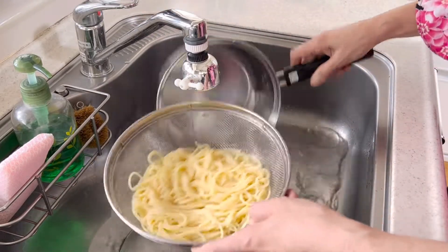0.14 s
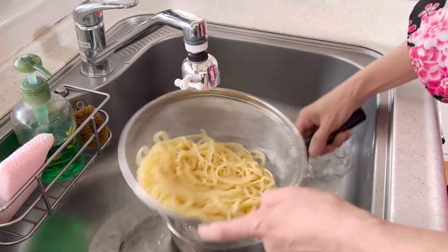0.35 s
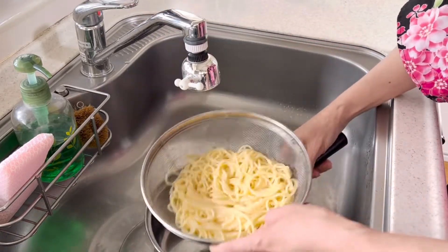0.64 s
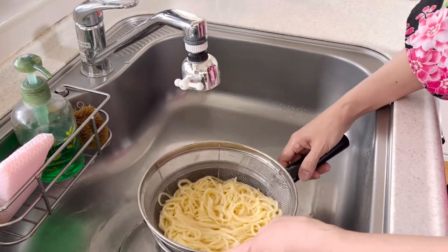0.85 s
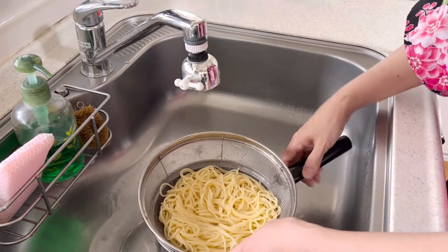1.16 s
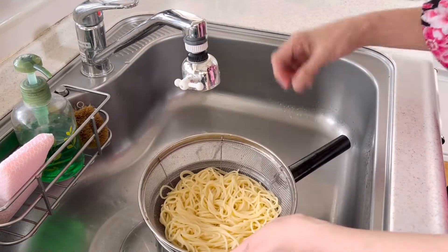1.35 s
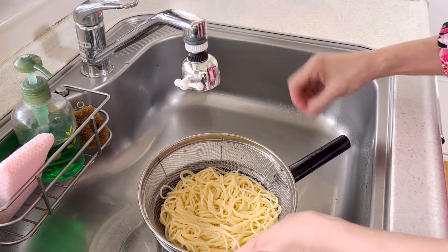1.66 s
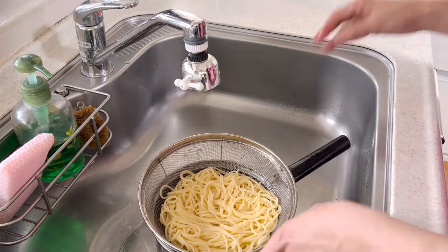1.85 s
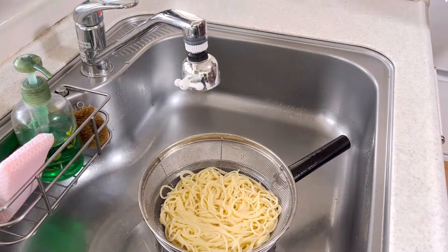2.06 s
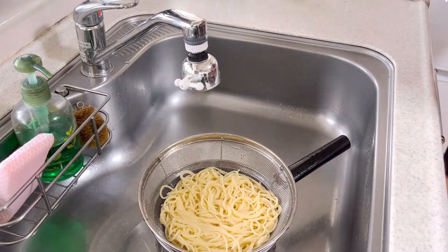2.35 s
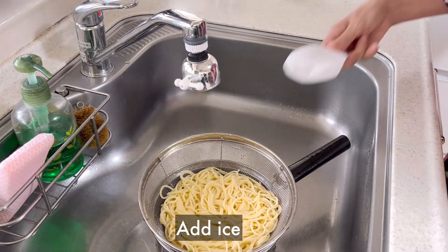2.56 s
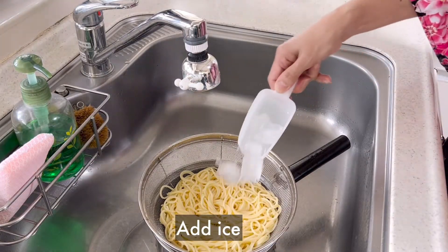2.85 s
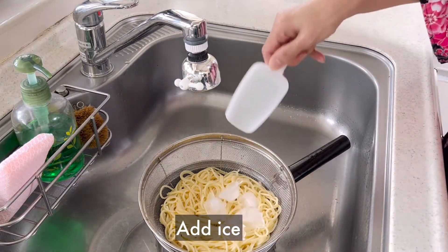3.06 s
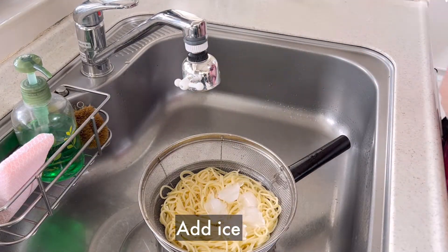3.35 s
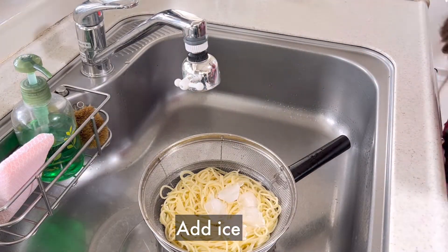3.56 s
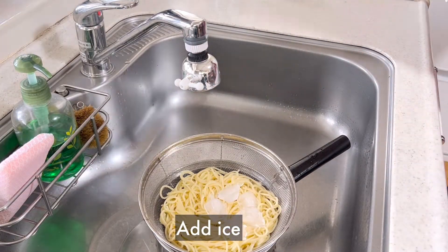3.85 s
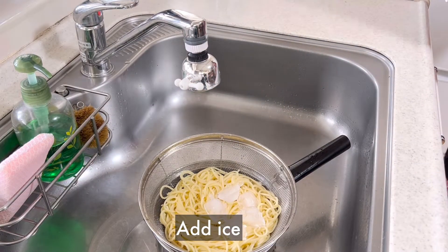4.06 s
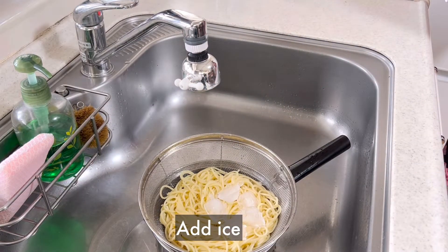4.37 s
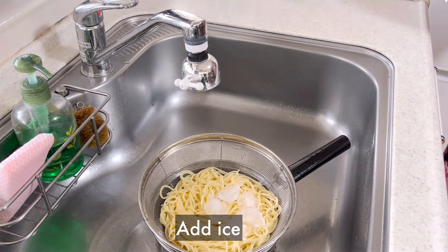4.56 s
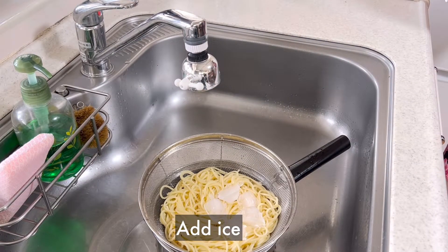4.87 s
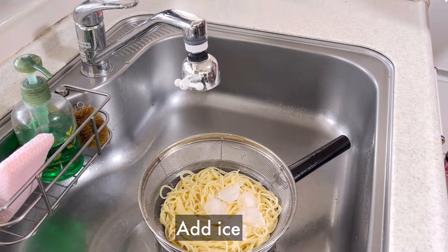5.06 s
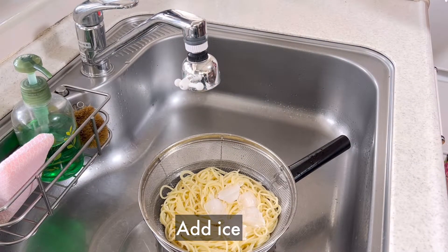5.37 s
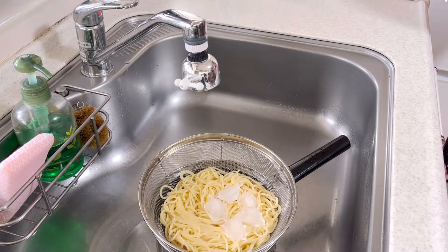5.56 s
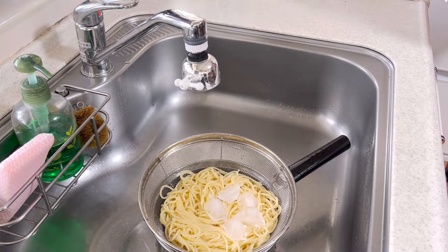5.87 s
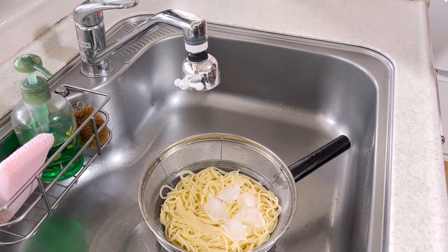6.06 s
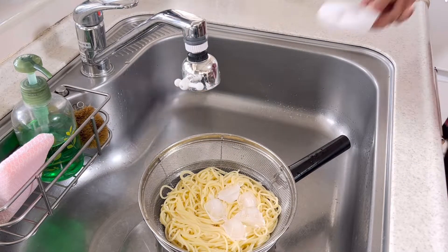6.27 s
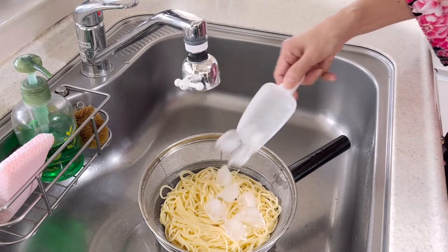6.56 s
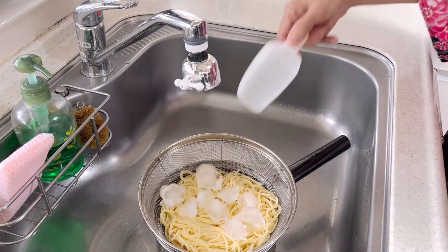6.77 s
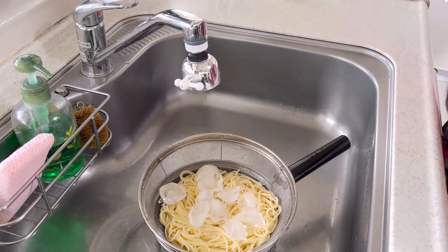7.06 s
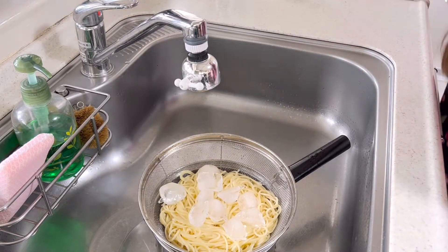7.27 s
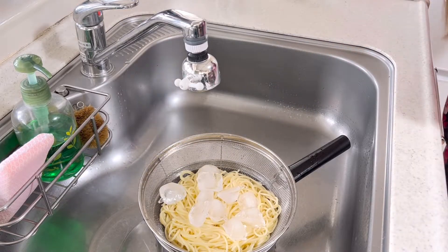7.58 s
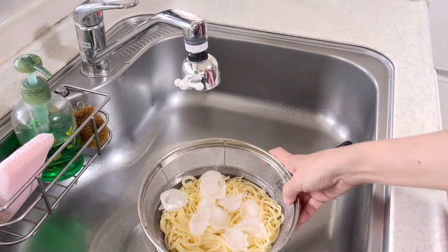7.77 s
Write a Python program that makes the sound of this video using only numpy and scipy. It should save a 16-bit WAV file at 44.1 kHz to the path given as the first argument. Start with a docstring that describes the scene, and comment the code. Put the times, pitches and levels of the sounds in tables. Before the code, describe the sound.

A quiet small kitchen with low ventilation rumble and faint hiss, heard close to a steel sink in stereo. At 0 s water plops and splashes into the drain; from 0.4 to 1 s hollow, booming steel knocks, loudest first, with light wire-mesh scrapes. Gurgles and drips thin out until about 2 s, where the sound briefly dips. Soft rustles follow; from 2.5 to 3.1 s ice cubes slide and rattle brightly in a hollow plastic scoop, ending in sharp ice cracks. Near silence with a tiny squeak. From 3.9 to 5.6 s the scoop digs in an ice bin across the room: dull thuds, crunchy tumbling and scraping. Quiet again, faint squeaks near 6 s. At 6.35 to 6.8 s a second, shorter ice clatter and a light sink knock. At 7.46 s the scoop clunks back into the bin; another quick dip at 7.65 s, then a faint low bump and rustle at 7.8 s.

```python
"""A pan and a mesh strainer of pasta set down in a steel sink excite the decaying modes of the basin.
The cooking water gurgles away: air pockets ring in the drain and drips splatter on the steel.
Ice rattles out of a plastic scoop onto the pasta, as collisions coloured by the scoop's resonances.
Across the kitchen the scoop digs in the ice bin, a second load is tipped in, and the scoop is dropped back.
Room tone and soft rustles lie beneath, and twice the whole sound dips briefly."""
import sys
import numpy as np
from scipy import signal
from scipy.fft import rfft, irfft
from scipy.io import wavfile
from scipy.ndimage import uniform_filter1d

SR = 44100
rng = np.random.default_rng(int(sys.argv[2]) if len(sys.argv) > 2 else 0)


def wrap_up_sound(samples):
    """Save the sound to the file named by the first command line argument, as 16-bit audio."""
    columns = np.atleast_2d(samples).T
    # keep every value between -1 and 1, then stretch to whole-number steps
    tamed = np.clip(columns, -1, 1)
    steps = np.round(tamed * 32767).astype(np.int16)
    wavfile.write(sys.argv[1], SR, steps)


N = 349272
TAPS = 4096  # length of the filter design
HZ = np.fft.rfftfreq(TAPS, 1 / SR)
TIME = np.arange(N) / SR

# Room tone spectrum. Each row: frequency in Hz, level in dB.
AIR = [(15, -65), (25, -33), (42, -10.5), (70, -1), (166, -15), (223, -9.5), (256, -14.5), (344, -12.5),
       (384, -20.5), (796, -19), (2050, -32), (2550, -33.5), (5280, -38.5), (7710, -37.5), (16000, -53)]
AIR_DB = -60
# Soft rustles of a moving hand, last as it takes the strainer.
# Each row: start in seconds, relative level in dB, attack, hold and release in seconds.
RUSTLES = [(2.095, -58.5, .01, .005, 0.035), (2.33, -67.5, .08, 0.088, 0.13),
           (5.935, -73.5, .04, .01, 0.048), (6.2, -68, 0.046, 0.063, .1), (6.93, -68, 0.11, 0.025, 0.057),
           (7.83, -69.5, .15, .05, .3)]
# Reverberation of the kitchen. Each row: frequency in Hz, t60 in seconds.
KITCHEN_T60 = [(100, 0.1), (600, 0.34), (2000, 0.28), (6000, 0.34), (15000, 0.32)]
# Likeness of diffuse sound in the two channels. Each row: frequency in Hz, correlation from 0 to 1.
LIKENESS = [(50, .98), (130, .94), (250, .8), (600, .45), (1200, .25), (2500, .25), (16000, .4)]

# Colour of the bin's walls. Each row: frequency in Hz, level in dB.
BIN_WALL = [(71, -63), (120, -36.5), (251, -19.5), (513, -8.5), (805, -13.5), (911, -9), (1290, -9),
            (1680, -6.5), (2020, -9), (2340, -1), (5080, -19.5), (10400, -25), (12300, -33.5), (13900, -23),
            (16000, -35.5)]
# Resonances of the bin. Each row: frequency in Hz, width in Hz, undamped height above the wall colour in dB.
BIN_RINGS = [(529.3, 25, 8.5), (677, 83, 6), (930, 134, 6), (1127, 17, 6.5), (1680, 400, 3),
             (2264, 230, -1.5)]
RING_DEPTH = 0.81  # the heap of cubes damps the bin's resonances to this share of their height in dB
# Pushes of the scoop through the ice.
# Each row: start in seconds, relative level in dB, attack, hold and release in seconds.
STROKES = [(3.932, -57, 0.0065, 0.16, .1), (4.275, -25, 0.15, 0.023, 0.22), (4.57, -51.5, 0.066, 0.16, .1),
           (4.885, -34.5, 0.067, 0.036, 0.11), (4.985, -31.5, 0.23, 0.027, 1),
           (5.375, -31, 0.064, 0.034, .15)]
SCOOP_OUT_S, SETTLE_DB_PER_S = 5.4, 72.5  # once the scoop is lifted out, the cubes come to rest
# Scraping and rumble relative to the push; scraping grows as a power of the push.
SCRAPE_DB, SCRAPE_LAW, RUMBLE_DB = -4.5, 1.0, -24
# The cabinet that holds the bin. Each row: frequency in Hz, level in dB.
CABINET = [(40, -26), (70, -1.5), (115, 8), (160, -22), (215, -11), (300, -4), (600, -49)]
# The plastic of the scoop rings as it rubs on the cubes.
# Each row: start in seconds, relative level in dB, attack, hold and release in seconds.
RUBS = [(3.928, -43, 0.0026, .01, 0.21), (4.022, -42.5, .004, .02, .14), (4.714, -43.5, .008, .015, .08),
        (4.755, -40, 0.0068, 0.062, 0.21)]
# Blows in the bin. Each row: start in seconds, level in dB, brightness in dB per octave,
# chatter decay in seconds.
BUMPS = [(3.927, -43.5, 9, 0.016), (4.026, -37, 4, 0.03), (4.188, -28, 3, 0.032), (4.336, -27, 7, 0.0027),
         (4.938, -30, -3, 0.021), (5.007, -32, 5.5, 0.044), (5.366, -31.5, 12, 0.0054),
         (5.529, -30, -5.5, 0.004)]
# The floor of the bin booms under a push. Each row: start in seconds, level in dB, decay in seconds.
THUDS = [(3.931, -46, 0.022), (3.946, -39, 0.13), (4.023, -32.5, 0.024), (4.13, -39.5, 0.025),
         (4.283, -25.5, 0.048), (4.576, -43.5, 0.018), (4.615, -45, 0.04)]
# Colour of the bin floor. Each row: frequency in Hz, level in dB.
BIN_FLOOR = [(150, -51), (300, -12.5), (380, -5), (510, 0), (620, -8.5), (800, -19.5), (2000, -19.5),
             (8000, -54)]
# The scoop lands back in the bin and settles.
# Each row: start in seconds, level in dB before DROP_LIFT_DB, chatter decay in seconds.
DROPS = [(7.461, -35.5, 0.0058), (7.466, -31.5, 0.018), (7.493, -38.5, 0.033), (7.633, -64, .006)]
DROP_LIFT_DB = 3.5
# Colour of the dropped scoop. Each row: frequency in Hz, level in dB.
DROPPED = [(88, -57), (150, -25), (334, -18), (376, 0.5), (662, -11), (941, -1.5), (1040, -10), (2100, -7),
           (2360, -5.5), (3350, -18.5), (10000, -25.5), (11700, -33), (12400, -41), (14000, -25),
           (16000, -53)]

# Resonances of the scoop. Each row: frequency in Hz, width in Hz, level in dB.
SCOOP_RINGS = [(2230, 71, 8.5), (2400, 90, 5.5), (3900, 400, -9), (4480, 600, -10), (5480, 400, -5)]
# Broad sound of the scoop's shell. Each row: frequency in Hz, level in dB.
SCOOP_SHELL = [(120, -31), (300, -19.5), (800, -14.5), (1600, -12.5), (3000, -1), (6000, -13), (10000, -13),
               (14500, -19), (16000, -21)]
# Shell against resonances: rubbing wakes the resonances, sliding cubes damp the ring, strikes free it.
RUB_SHELL_DB, SLIDE_SHELL_DB, STRIKE_SHELL_DB = -9, 8, -3
RING_SPREAD = 0.037  # the load of cubes shifts the resonances from strike to strike (share)
RING_LIFT = 0.033  # a struck scoop rings slightly higher than one loaded with sliding cubes (share)
# Cubes slide along the scoop.
# Each row: start in seconds, relative level in dB, attack, hold and release in seconds.
SLIDES = [(2.39, -66.5, .08, 0.027, .1), (2.77, -40, 0.094, 0.055, 0.33), (6.305, -59, 0.056, 0.031, .07),
          (6.42, -54, .008, .03, .05), (6.462, -37.5, 0.033, .008, .03), (6.51, -33, 0.048, 0.023, 0.052),
          (6.6, -42.5, .012, 0.013, 0.19)]
# The harder strikes of ice on the scoop. Each row: start in seconds, level in dB,
# brightness in dB per octave, chatter decay in seconds.
RATTLES = [(2.537, -48.5, -2, 0.015), (2.6635, -41, -4.5, .002), (2.704, -36, -2.5, 0.011),
           (2.723, -38.5, 0, 0.024), (2.743, -37, -5.5, .004), (2.765, -22, 1.5, .0056),
           (2.779, -23.5, -.5, 0.011), (2.804, -30.5, -2, .01), (2.825, -29.5, -2.5, 0.025),
           (2.864, -34, -3.5, 0.0077), (2.8885, -32.5, -2.5, 0.0017), (2.903, -31.5, -3.5, 0.0044),
           (2.923, -32.5, -1.5, 0.0029), (2.955, -20, -2.5, 0.0015), (6.345, -51.5, -7, 0.011),
           (6.461, -36, 2.5, 0.0077), (6.494, -20.5, 7.5, 0.0017), (6.501, -28, -5, 0.017),
           (6.512, -17, 4.5, 0.0079), (6.535, -30.5, -8.5, 0.0053), (6.591, -26.5, 0, 0.0086),
           (6.617, -30, 7, .0017), (6.647, -33, 11.5, 0.016)]
# Ice cracks against ice. Each row: start in seconds, level in dB, chatter decay in seconds.
CLACKS = [(2.9972, -18, .0003), (3.0385, -28, .0008), (3.058, -44, .005), (3.108, -52, .003),
          (6.641, -38, .003), (6.676, -34, .002), (6.682, -34, .001), (6.703, -42, .002),
          (6.758, -44, .003), (6.7727, -32, .001), (6.8026, -42, .002), (6.835, -52, .006)]
CLACK_BRIGHT_DB = 2  # a crack is brighter than a skid (dB per octave)
SKID_DB, SKID_S = -20, 0.072  # after a crack the cubes skid: level relative to the crack, release
# Colour of ice on ice. Each row: frequency in Hz, level in dB.
ICE = [(200, -26), (1000, -17), (2500, -9), (3700, 0), (5500, 0), (8000, -6), (11000, -13), (16000, -16)]
# Thin squeaks of ice warming on the pasta. Each row: start in seconds, level in dB, frequency in Hz,
# life in seconds.
SQUEAKS = [(3.44, -85, 3850, 0.031), (5.995, -79, 3200, .04), (6.117, -70.5, 3770, 0.036),
           (7.379, -76, 2960, .025)]

# The larger bubbles and drips. Each row: start in seconds, level in dB, starting frequency in Hz,
# rise in octaves per second.
BUBBLES = [(0.012, -36.5, 2250, 1), (.041, -43, 3560, 10), (.061, -22.5, 519.4, 75), (.079, -36, 1440, 33),
           (.154, -34, 1300, 34), (.857, -37, 319, 7), (0.906, -47, 1740, 8.2), (0.938, -39.5, 2165, 6.7),
           (1.054, -50.5, 357, 4), (1.159, -48.5, 324, 3.4), (1.231, -44, 356, 3), (1.293, -52.5, 403, 9),
           (1.321, -51.5, 1700, 4), (1.365, -51, 3950, 8), (1.637, -61, 340, 4), (1.849, -41, 338, 4),
           (1.852, -41, 587, 5)]
BUBBLE_LIFE_S = 0.01  # at 1 kHz; larger, lower bubbles last longer
# Flow of water down the drain. Each row: time in seconds, relative level in dB.
DRAIN_FLOW = [(0.0, -49), (.25, -61), (.72, -55), (1.0, -54), (1.2, -49.5), (1.8, -60), (2.0, -61.5)]
# Colour of the churning drain. Each row: frequency in Hz, level in dB.
GURGLE = [(59, -33), (100, -0.5), (167, -16.5), (360, -3), (529, -27), (733, -20.5), (908, -31),
          (2680, -49), (3000, -30), (3900, -43), (6600, -120)]
# Colour of drops on steel, also lent to the rustles. Each row: frequency in Hz, level in dB.
SPLATTER = [(530, -19), (900, -9.5), (2190, -2.5), (2660, -7), (9880, -12), (12300, -20), (14200, -10.5),
            (16000, -32)]
# The strainer drips less and less: relative level at the start, its fall, and the end of drips and glugs.
DRIP_DB, DRIP_FADE_DB_PER_S, DRIP_END_S = -60, 10.5, 2.0
# Each knock stirs the water: gurgle and spray relative to its boom, and their release.
SLOSH_DB, SLOSH_SPRAY_DB, SLOSH_S = -22, -46, 0.21
# Water slaps onto the steel.
# Each row: start in seconds, relative level in dB, attack, hold and release in seconds.
SPLASHES = [(0.0, -48, .01, 0.047, 0.094), (.06, -40.5, .04, 0.0042, 0.08), (.14, -51.5, .03, 0.012, 0.044),
            (.31, -59.5, .02, 0.017, 0.063), (.86, -56, 0.037, 0.069, 0.23)]

# Blows on the sink. Each row: start in seconds, boom in dB, contact click in dB, strongest frequency
# of the boom in Hz, ring as a factor on the basin's t60, heave of the whole basin in dB.
KNOCKS = [(.402, -10.5, -26, 167, 0.47, -50), (0.482, -22.5, -36, 302, 0.91, -52),
          (.533, -14.5, -28, 246, 1.36, -57), (.682, -22, -37.5, 230, 0.84, -44),
          (.739, -35.5, -46.5, 170, 2.1, -42), (0.793, -39, -75, 257, 3.5, -58),
          (0.855, -31, -64, 276, 1, -37), (.985, -40, -66, 130, 0.76, -47),
          (6.764, -31.5, -57, 240.4, 0.65, -68), (7.795, -46.5, -75, 220, 1.3, -67.5)]
# Modes of the steel basin. Each row: frequency in Hz, level in dB, t60 in seconds before the ring factor.
SINK_MODES = [(63.4, -26, 1), (96, -28, 0.096), (135, -5, 0.17), (224.9, 1.5, 0.19), (259.5, -6, 0.16),
              (325.7, -4.5, 0.1), (376.4, -1.5, 0.091), (435, -17.5, 0.31), (601.6, -13, 0.16),
              (797, -26, 0.11), (1082, -10.5, 0.056), (1196, -26, 0.14), (1636, -29, 0.058),
              (1580, -25, .25), (1810, -28, 0.13), (2100, -27, 0.21)]
# The basin on its mounts. Each row: frequency in Hz, level in dB, t60 in seconds.
HEAVE_MODES = [(65.4, -7, 0.25), (94, -12, 0.17)]
# Colour of the hard contact. Each row: frequency in Hz, level in dB.
CONTACT = [(100, 7), (500, -20), (1200, 3), (2000, -5.5), (3200, -10.5), (6000, -17), (11000, -19),
           (16000, -20)]
# The wire mesh brushes the steel. Each row: start in seconds, level in dB, scrape decay in seconds.
BRUSHES = [(0.315, -65, 0.023), (0.739, -36, 0.013), (0.85, -35.5, 0.011), (0.962, -51.5, 0.02),
           (1.181, -61, .005), (1.678, -57, 0.0046)]
# Colour of the brushing mesh. Each row: frequency in Hz, level in dB.
MESH = [(500, -19), (1800, -25.5), (3500, -4), (7000, -1), (10500, 4.5), (14500, 7), (16000, -12)]

# The level dips briefly. Each row: lowest from in seconds, fade-out, low stretch and fade-in in seconds.
DIPS = [(1.999, 0.12, 0.038, 0.14), (7.641, 0.0061, 0.02, 0.13)]
DIP_FLOOR_DB = -38
EDGE_HZ = 16000  # upper band limit


def amp(db):
    """Decibels are a logarithmic measure: converts them to gain."""
    return 10 ** (np.asarray(db) / 20)


def evened(x):
    """Mean power: scales the whole signal to rms 1."""
    return x / np.sqrt(np.mean(x ** 2) + 1e-20)


def topped(x, size=132):
    """Short-time power: scales so that the loudest 3 ms have rms 1."""
    return x / np.sqrt(uniform_filter1d(x ** 2, size).max())


def read(points, hz=HZ):
    """Logarithmic frequency axis: interpolates a spectrum table along it."""
    f, value = np.transpose(points)
    return np.interp(np.log(hz + 1), np.log(f + 1), value)


def octaves(centre_hz):
    """Pitch interval: distance of every frequency from a centre, limited to three octaves."""
    return np.clip(np.log2((HZ + 1) / centre_hz), -3, 3)


def add(mix, s, sound):
    """Superposition: mixes a sound in at time s."""
    part = mix[max(round(s * SR), 0):][:len(sound)]
    part += sound[:len(part)]


def tint(x, db):
    """Minimum phase: a causal filter follows from its gain in dB, relative to the peak."""
    log_gain = np.log(amp(np.maximum(db - db.max(), -90)))
    mirrored = np.r_[log_gain, log_gain[-2:0:-1]]
    response = np.exp(signal.hilbert(mirrored).conj())
    impulse = np.fft.ifft(response).real[:TAPS // 2]
    return signal.oaconvolve(x, impulse)[:len(x)]


def blow(db, length, colour, size=8192):
    """Impact excitation: decaying contact chatter takes the colour of the struck thing."""
    decay = np.exp(-TIME[:size] / max(length, 1e-4))
    chatter = rng.standard_normal(size) * decay
    return amp(db) * topped(tint(chatter, colour))


def patter(per_s, spread_db, size=1500):
    """Shot noise: random small collisions of unequal size, at a nearly steady mean power."""
    struck = rng.random(N) < per_s / SR
    sizes = amp(spread_db * np.minimum(rng.exponential(1, N), 4))
    clicks = struck * rng.choice([-1, 1], N) * sizes
    return clicks / np.sqrt(abs(uniform_filter1d(clicks ** 2, size)) + 0.00088)


def grains(span, per_s, ring_s, spread_db, rise, size=900):
    """A shower of tiny damped oscillators of random pitch; high ones die sooner."""
    start, stop = span
    draws = rng.random((int((stop - start) * per_s), 4))
    s, pitch, weight, turn = draws.T[:, :, None]
    hz, t = (17 + 110 * pitch) ** 2, TIME[:size]
    loud = amp(spread_db * np.minimum(-np.log(1 - weight), 3)) * np.sqrt(hz)
    envelope = np.exp(-t / ring_s * np.sqrt(hz / 1000)) * (1 - np.exp(-t * hz))
    rings = loud * envelope * np.sin(2 * np.pi * (hz * t * (1 + rise * t) + turn))
    at = ((start + s * (stop - start)) * SR).astype(int) + np.arange(size)
    out = np.bincount(np.clip(at, 0, N).ravel(), rings.ravel(), N + 1)[:N]
    return evened(out) * np.sqrt((stop - start) * SR / N)  # rms 1 within the span


def swells(rows):
    """Powers add: overlapping movements each rise 20 dB in the attack, hold, and fall 20 dB in the release."""
    power = np.zeros(N)
    for s, db, attack, hold, release in rows:
        before = np.maximum(s - TIME, 0) / max(attack, 1e-3)
        after = np.maximum(TIME - s - hold, 0) / max(release, 1e-3)
        power += amp(db - 20 * np.minimum(before + after, 10)) ** 2
    return np.sqrt(power)


def diffuse(size):
    """Diffuse field: noise in two channels whose likeness varies with frequency."""
    a, b = rfft(rng.standard_normal((2, size)))
    same = np.clip(read(LIKENESS, np.fft.rfftfreq(size, 1 / SR)), 0, 1)
    mid, side = a * np.sqrt((1 + same) / 2), b * np.sqrt((1 - same) / 2)
    return irfft(np.array([mid + side, mid - side]), size)


def kitchen(x, wet_db, near_db, pan_db, near_s=0.0054):
    """Room response: direct sound, quick reflections from close walls, and the reverberant tail."""
    size = SR // 2
    t = TIME[:size]
    hz, frame_s, z = signal.stft(diffuse(size), SR, nperseg=256)
    decay = amp(-60 * frame_s / read(KITCHEN_T60, hz)[:, None])
    tail = signal.istft(z * decay, SR, nperseg=256)[1][:, :size]
    tail = tail * np.minimum(t / 0.0025, 1)
    near = diffuse(size) * np.exp(-t / near_s) * (t > .001)
    echo = (amp(wet_db) * evened(tail) + amp(near_db) * evened(near)) / np.sqrt(size)
    echo[:, 0] += 1  # direct sound
    heard = signal.oaconvolve(x[None], echo / np.linalg.norm(echo[0]), axes=1)[:, :N]
    return heard * amp([[pan_db / 2], [-pan_db / 2]])


def roaming(x, turns_per_s, wet_db, near_db, pan_db, count=2):
    """A moving source: power-preserving fades between rooms keep its reflections changing."""
    shares = [np.cos(np.pi * (turns_per_s * TIME + k / count)) * np.sqrt(2 / count) for k in range(count)]
    return sum(kitchen(x * share, wet_db, near_db, pan_db) for share in shares)


def bubble(hz, rise, life):
    """Bubble resonance: an air pocket rings, and its pitch climbs as it nears the surface."""
    t = np.arange(0, 5 * life, 1 / SR)
    pitch = hz * 2 ** np.minimum(rise * t, 1.5)
    envelope = (1 - np.exp(-t * hz)) * np.exp(-(t / life) ** 1.6)
    return topped(np.sin(2 * np.pi * np.cumsum(pitch) / SR) * envelope)


def scoop_colour(shift=1, shell_db=0):
    """Resonance curves in dB: the hollow plastic's rings, moved by a factor, over its broad shell."""
    rings = sum(amp(db) ** 2 / (1 + (2 * (HZ - hz * shift) / width) ** 2) for hz, width, db in SCOOP_RINGS)
    shell = amp(read(SCOOP_SHELL) + shell_db) ** 2
    return 10 * np.log10(rings * np.minimum(HZ / 2000, 1) ** 2 + shell)


def room_tone():
    """Filtered diffuse noise: a low ventilation rumble with faint hiss, and the rustles of a moving hand."""
    air = irfft(rfft(diffuse(N)) * amp(read(AIR, np.fft.rfftfreq(N, 1 / SR))), N)
    rustle = evened(tint(patter(per_s=2900, spread_db=-0.5), read(SPLATTER)))
    hand = rustle * swells(RUSTLES)
    return amp(AIR_DB) * evened(air) + kitchen(hand, wet_db=-1.0, near_db=-14.5, pan_db=3.5)


def ice_bin(full_push_db=-30):
    """Collision noise in a resonant box: cubes tumble at its walls while the scoop scrapes through them."""
    rings = sum(db / (1 + (2 * (HZ - hz) / width) ** 2) for hz, width, db in BIN_RINGS)
    colour = read(BIN_WALL) + RING_DEPTH * rings
    # the walls carry the low part, the cubes themselves the high part
    low = 1 / (1 + (HZ / 3000) ** 4)
    wall_colour = colour + 10 * np.log10(low)
    cube_colour = colour + 10 * np.log10(1 - low + 1e-9)

    push = swells(STROKES) * amp(-SETTLE_DB_PER_S * np.maximum(TIME - SCOOP_OUT_S, 0))
    chinks = grains((3.9, 5.9), per_s=3000, ring_s=.003, spread_db=3.5, rise=0, size=550)
    cubes = chinks + patter(per_s=600, spread_db=3.8) * (abs(TIME - 4.9) < 1)
    tumble = amp(-0.5) * evened(tint(cubes, wall_colour)) * push
    scraping = amp(full_push_db + SCRAPE_DB) * (push / amp(full_push_db)) ** SCRAPE_LAW
    scrape = evened(tint(cubes, cube_colour)) * scraping
    rumble = amp(RUMBLE_DB) * evened(tint(patter(per_s=490, spread_db=2.0), read(CABINET))) * push
    rub_colour = scoop_colour(shell_db=RUB_SHELL_DB) + 3.3 * octaves(3000)
    rubbing = evened(tint(patter(per_s=3000, spread_db=4.5), rub_colour)) * swells(RUBS)

    bumps, dropped = np.zeros(N), np.zeros(N)
    for s, db, bright_db, length in BUMPS:
        add(bumps, s, blow(db, length, colour + bright_db * octaves(1160)))
    for s, db, length in THUDS:
        add(bumps, s, blow(db, length, read(BIN_FLOOR)))
    for s, db, length in DROPS:
        add(dropped, s, blow(db, length, read(DROPPED)))
    digging = tumble + scrape + rumble + rubbing + bumps
    moving = roaming(digging, 1.7, wet_db=-4, near_db=-2, pan_db=.3)
    return moving + amp(DROP_LIFT_DB) * kitchen(dropped, wet_db=-20, near_db=2.5, pan_db=1.0)


def scoop():
    """Excited resonances: cubes slide and knock along hollow plastic, then crack together in the strainer."""
    grit = np.zeros(N)
    for side in (-1, 0, 1):
        colour = scoop_colour(1 + side * RING_SPREAD, SLIDE_SHELL_DB)
        grit += tint(patter(per_s=760, spread_db=2.5), colour)
    plastic = amp(-1) * evened(grit) * swells(SLIDES)
    for s, db, bright_db, length in RATTLES:
        shift = 1 + RING_LIFT + RING_SPREAD * rng.uniform(-0.85, 1)
        colour = scoop_colour(shift, STRIKE_SHELL_DB) + bright_db * octaves(2800)
        add(plastic, s, blow(db, length, colour))

    skids = swells([(s, db + SKID_DB, .002, 0, SKID_S) for s, db, length in CLACKS])
    ice = evened(tint(patter(per_s=1300, spread_db=6.0), read(ICE))) * skids
    for s, db, length in CLACKS:
        add(ice, s, blow(db, length, read(ICE) + CLACK_BRIGHT_DB * octaves(5000)))
    for s, db, hz, life in SQUEAKS:
        add(ice, s, amp(db) * bubble(hz, 0, life))
    moving = roaming(plastic, 3.1, wet_db=-7, near_db=-6, pan_db=1.5)
    return moving + kitchen(ice, wet_db=-8, near_db=-8, pan_db=4)


def water(count=420):
    """Bubble and drop acoustics: the drain glugs, drips fizz on the steel, and knocks stir up both."""
    plops, glugs = np.zeros(N), np.zeros(N)
    for s, db, hz, rise in BUBBLES:
        add(plops, s, amp(db) * bubble(hz, rise, BUBBLE_LIFE_S * np.sqrt(1000 / hz)))
    for when, pitch, size in rng.random((count, 3)):
        hz = 290 * 10 ** (pitch ** 1.5)
        gain = amp(-12 * size) * (270 / hz) ** 0.44
        add(glugs, when * DRIP_END_S, gain * bubble(hz, 1.5, 0.36 / np.sqrt(hz)))

    slosh = swells([(s, boom_db, .01, 0, SLOSH_S) for s, boom_db, *_ in KNOCKS])
    flow = amp(np.interp(TIME, *np.transpose(DRAIN_FLOW), right=-150))
    churn = evened(tint(patter(per_s=560, spread_db=3.5), read(GURGLE)))
    gurgle = (amp(-1.5) * glugs + amp(-3) * churn) * np.hypot(flow, amp(SLOSH_DB) * slosh)

    dripping = amp(DRIP_DB - DRIP_FADE_DB_PER_S * TIME)
    spray = np.sqrt(dripping ** 2 + swells(SPLASHES) ** 2 + (amp(SLOSH_SPRAY_DB) * slosh) ** 2)
    ringing_drops = grains((0, DRIP_END_S), per_s=1600, ring_s=0.0052, spread_db=3.0, rise=5.8)
    dry_drops = patter(per_s=2500, spread_db=0.5) * (TIME < DRIP_END_S)
    drops = ringing_drops + amp(-2.5) * dry_drops
    splatter = amp(-1.5) * evened(tint(drops, read(SPLATTER))) * spray
    return roaming(plops + gurgle + splatter, 2.3, wet_db=-9, near_db=-10, pan_db=0)


def sink(travel_s=0.00803, focus_db=4):
    """Modes and dispersion: knocks ring the basin, whose bending waves bring treble first and bass late."""
    boom, clicks, t = np.zeros(N), np.zeros(N), TIME[:SR // 2]
    for s, boom_db, click_db, centre_hz, ring, heave_db in KNOCKS:
        modes, heave, clang = np.zeros((3, len(t)))
        for hz, db, t60 in SINK_MODES:
            # the place of the blow favours the modes near one pitch
            cut = focus_db * min(np.log2(hz / centre_hz) ** 2, 1.3)
            modes += amp(db - cut - 60 * t / (t60 * ring)) * np.sin(2 * np.pi * hz * t)
            if hz > 550:  # the hard contact wakes the upper modes
                clang += amp(db - 60 * t / t60) * np.sin(2 * np.pi * (hz * t + rng.random()))
        for hz, db, t60 in HEAVE_MODES:
            heave += amp(db - 60 * t / t60) * np.sin(2 * np.pi * hz * t)
        heave *= np.minimum(t / 0.02, 1)
        add(boom, s, amp(boom_db) * topped(modes) + amp(heave_db) * topped(heave))
        add(clicks, s, blow(click_db, 0.0059, read(CONTACT)))
        add(clicks, s, amp(click_db - 10.0) * topped(clang))

    # travel_s is the delay at the fourth mode; the delay falls as 1 / sqrt(Hz)
    hz = np.fft.rfftfreq(N, 1 / SR)
    lag = 4 * np.pi * travel_s * np.sqrt(hz * SINK_MODES[3][0])
    boom = irfft(rfft(boom) * np.exp(-1j * lag), N)
    for s, db, length in BRUSHES:
        add(clicks, s, blow(db, length, read(MESH)))
    basin = kitchen(boom, wet_db=-11, near_db=-9, pan_db=0)
    return basin + kitchen(clicks, wet_db=-2.5, near_db=-2.0, pan_db=2.5)


def scene():
    """Superposition of the room, the bin, the scoop, the water and the sink."""
    return room_tone() + ice_bin() + scoop() + water() + sink()


def dips():
    """Amplitude modulation: the gain fades down, stays low for a moment and fades back in."""
    gates = [np.maximum((s - TIME) / fade_out, (TIME - s - low_s) / fade_in)
             for s, fade_out, low_s, fade_in in DIPS]
    return np.clip(np.min(gates, axis=0), amp(DIP_FLOOR_DB), 1)


def record(dry, notch_hz=12430, notch_width_hz=480, notch_db=-30, port_lag=0.52):
    """Linear filtering: right channel late by port_lag samples, treble notch, bass cut, dips, band limit."""
    hz = np.fft.rfftfreq(N, 1 / SR)
    late = irfft(rfft(dry[1]) * np.exp(-2j * np.pi * hz * port_lag / SR), N)
    notch = notch_db * np.exp(-((HZ - notch_hz) / notch_width_hz) ** 4)
    notched = [tint(x, notch) for x in (dry[0], late)]
    bass_cut = signal.butter(6, 48, "high", fs=SR, output="sos")
    heard = signal.sosfilt(bass_cut, notched) * dips()
    band_limit = signal.firwin(511, EDGE_HZ, window=("kaiser", 9), fs=SR)
    return signal.oaconvolve(heard, band_limit[None], "same")


dry = scene()
out = record(dry)
wrap_up_sound(out)
```